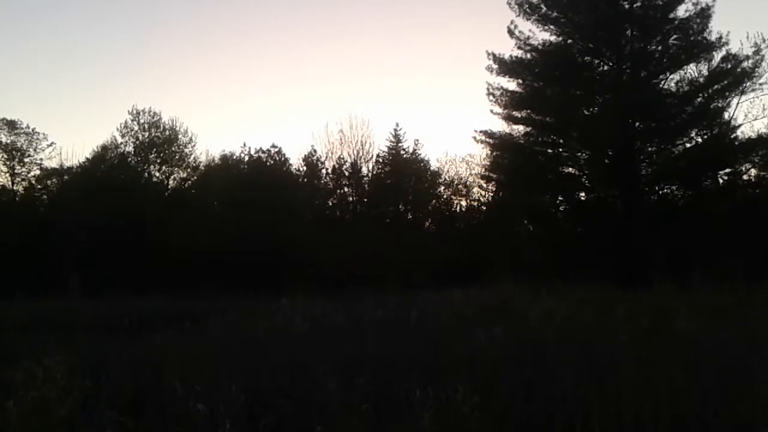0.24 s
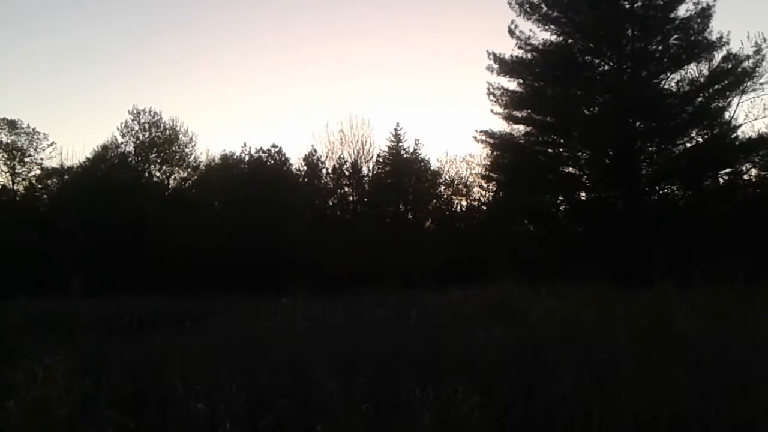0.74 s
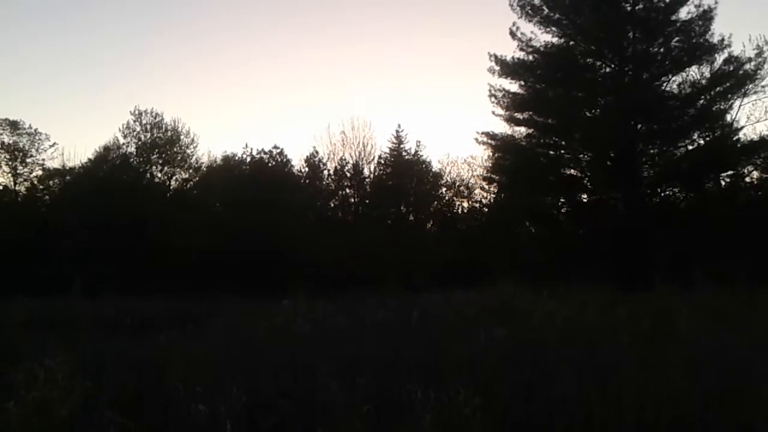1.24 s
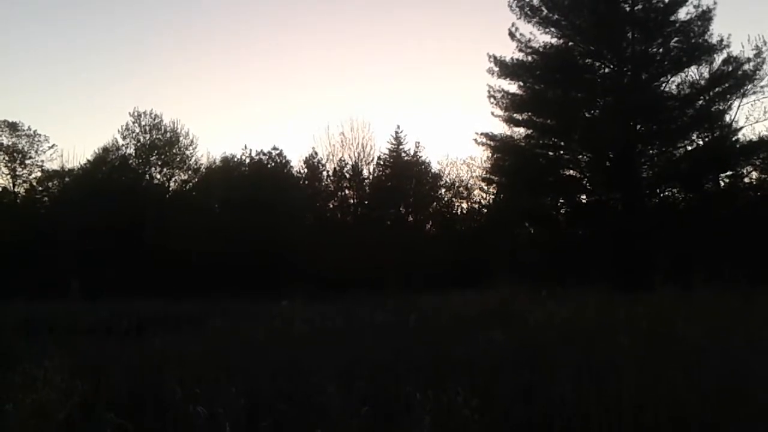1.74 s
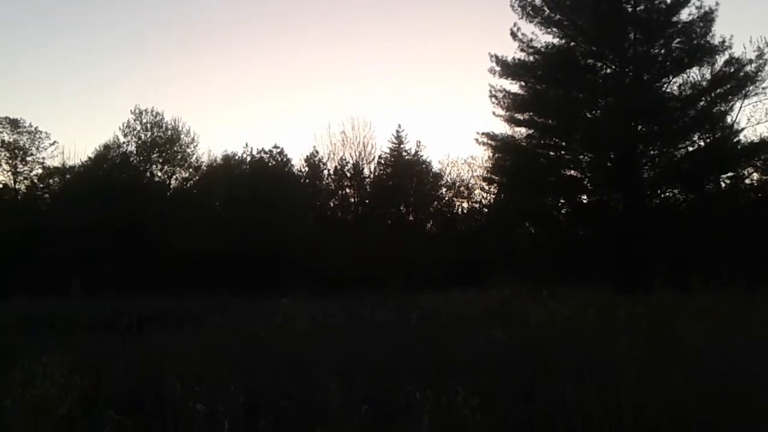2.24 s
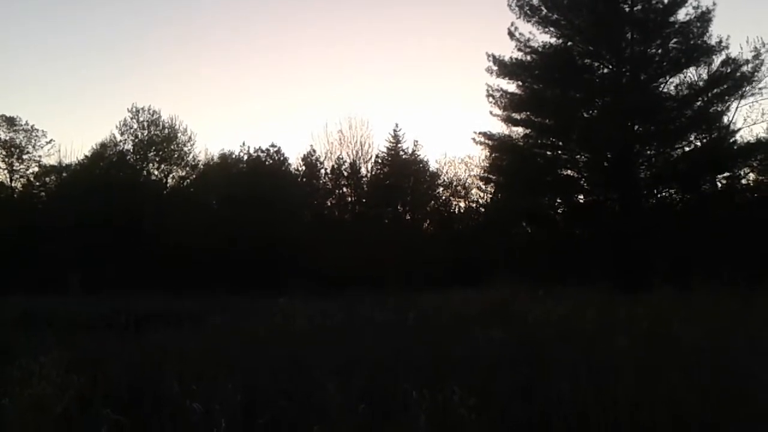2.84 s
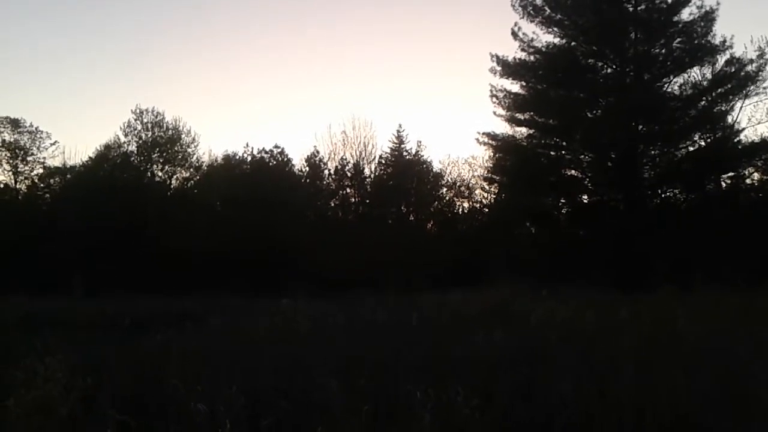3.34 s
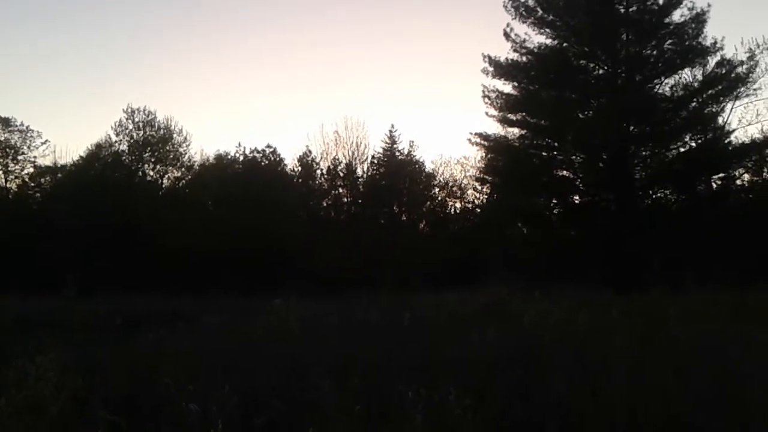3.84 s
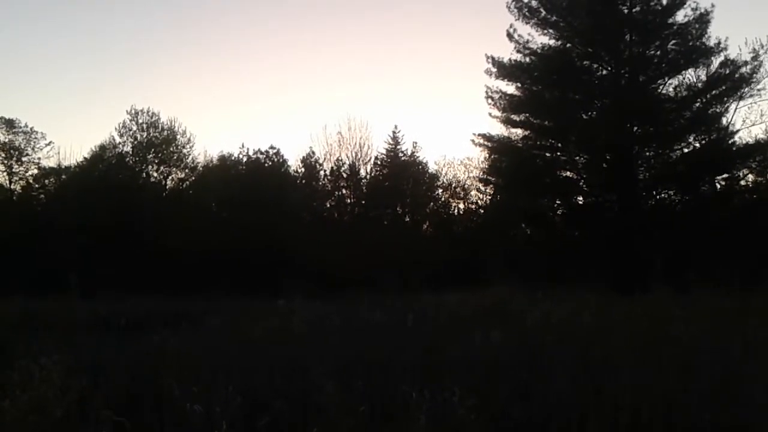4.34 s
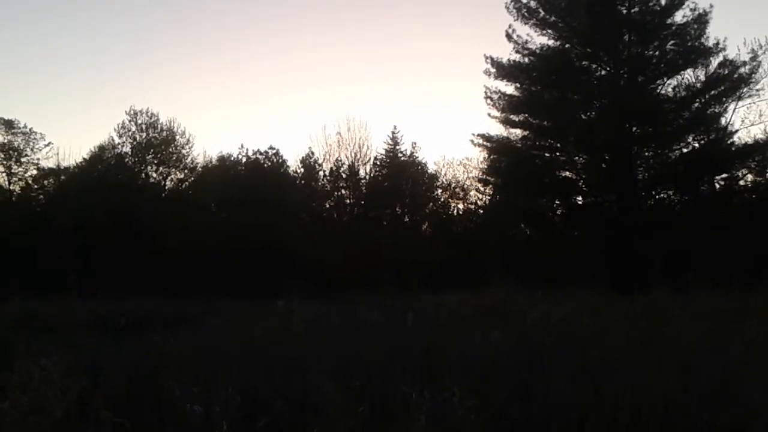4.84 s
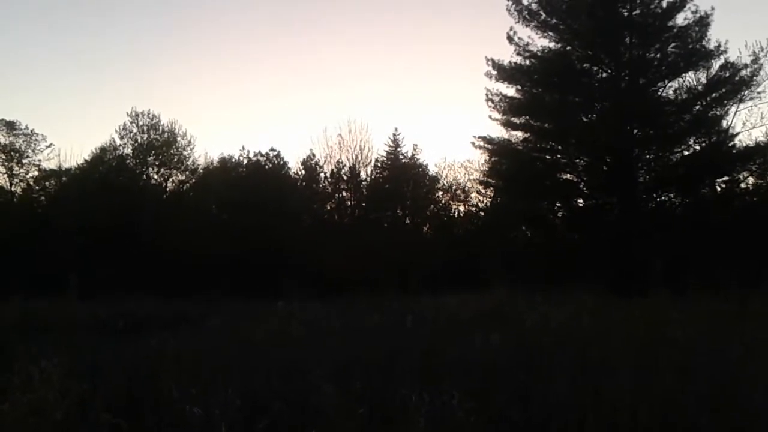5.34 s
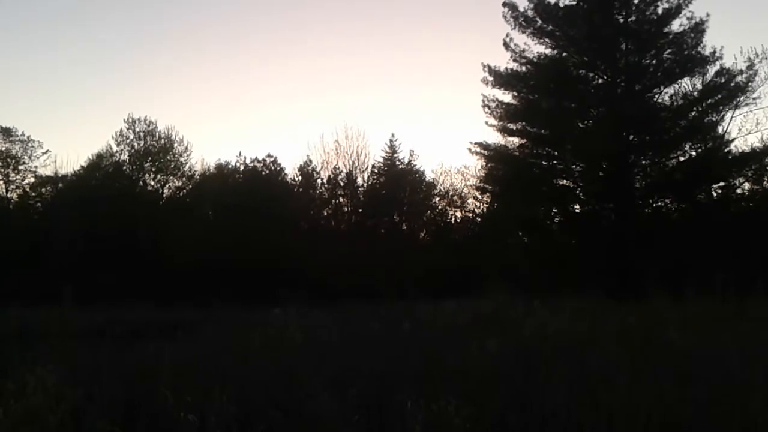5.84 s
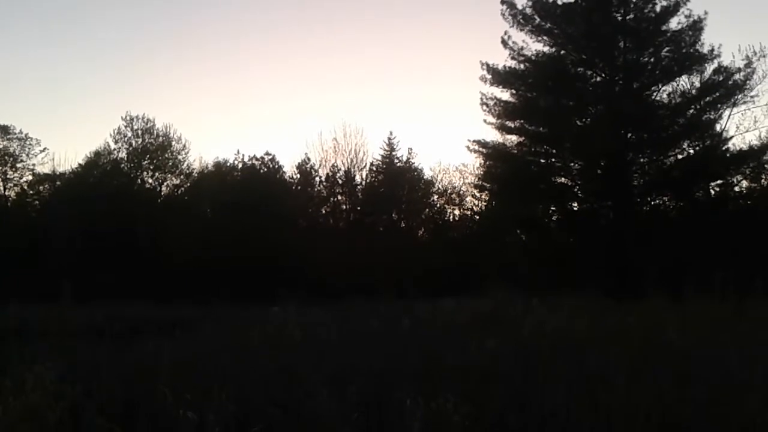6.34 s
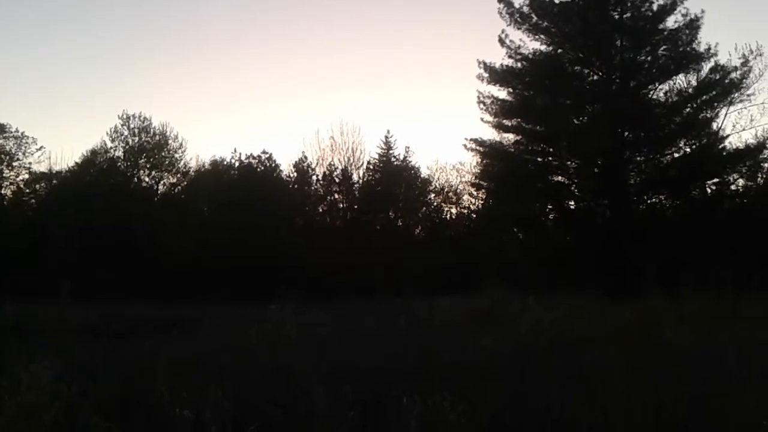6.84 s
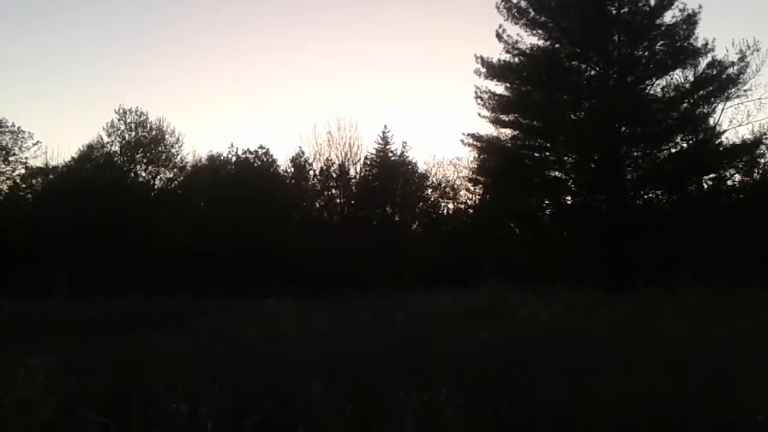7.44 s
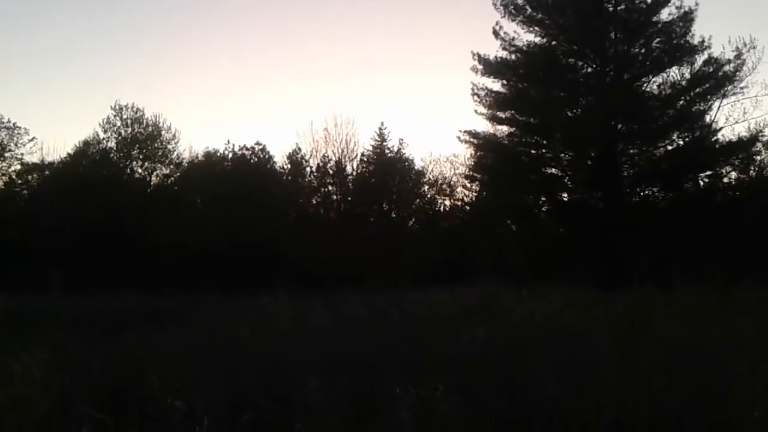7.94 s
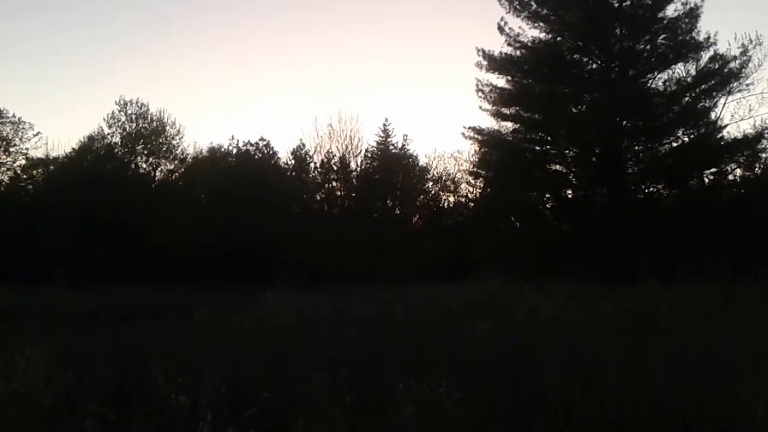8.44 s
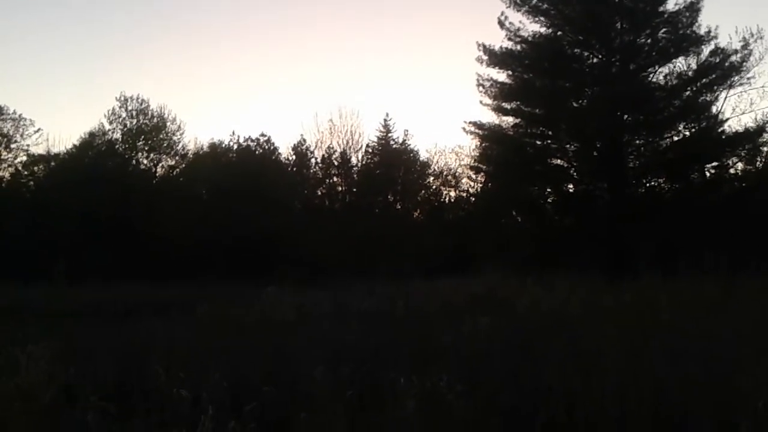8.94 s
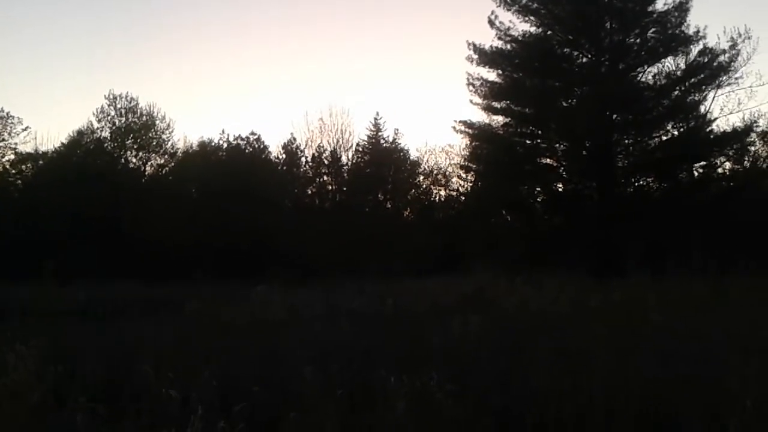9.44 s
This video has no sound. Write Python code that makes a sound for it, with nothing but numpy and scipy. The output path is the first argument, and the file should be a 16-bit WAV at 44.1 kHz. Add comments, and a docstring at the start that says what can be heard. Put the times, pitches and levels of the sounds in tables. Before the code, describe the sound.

Countless small frogs peep high and fast outdoors, tree frogs trill in overlapping bursts, sparse birds chirp and chip, faint distant traffic hum beneath.

```python
"""Small frogs whistle short rising peeps all over an open marsh at dusk: harmonic tones, the second strongest.
Tree frogs to the right call in slowing, overlapping trills of upward-scooping pulses. Birds whistle, chirp
and warble in gliding tones, and give chips of a falling tone with band noise. Distant traffic hum and
leafy hiss are shaped noise, with faint wandering tones; the tree line adds diffuse echoes to the calls."""
import sys
import numpy as np
from scipy import signal
from scipy.fft import rfft, irfft, next_fast_len
from scipy.io import wavfile
from scipy.ndimage import map_coordinates

SR = 44100
rng = np.random.default_rng(int(sys.argv[2]) if len(sys.argv) > 2 else 0)


def materialize(psi):
    """Save the field psi as 16-bit PCM at rate SR to the path in sys.argv[1].

    A 1-D psi becomes a single channel; in a 2-D psi each row is a channel.
    """
    bounded = np.clip(np.atleast_2d(psi).T, -1, 1)
    quanta = np.round(bounded * 32767).astype(np.int16)
    wavfile.write(sys.argv[1], SR, quanta)


N = 426888


def amp(db):
    """Amplitude ratio: 20 dB is a factor of ten."""
    return 10 ** (np.asarray(db) / 20)


def along(points, hz):
    """Interpolation of (frequency, value) points on a logarithmic frequency axis."""
    f, v = np.transpose(points)
    return np.interp(np.log(hz + 1), np.log(f + 1), v)


def filtered(x, response):
    """Linear filtering: the spectrum is multiplied by a response of frequency."""
    m = next_fast_len(N + SR // 4)
    hz = np.fft.rfftfreq(m, 1 / SR)
    return irfft(rfft(x, m) * response(hz), m)[..., :N]


def blank(spare_s=2):
    """Stereo silence with one second before the scene and room after it."""
    return np.zeros((2, N + spare_s * SR))


def add(track, s, sound, pan_db, lag_per_db):
    """Interaural cues: the farther microphone hears it softer and later (pan_db above 0 is left)."""
    for ear, side in enumerate((1, -1)):
        at = SR + round((s - side * pan_db * lag_per_db / 2) * SR)
        track[ear, at:at + len(sound)] += amp(side * pan_db / 2) * sound


def voice(hz, partials):
    """Harmonic synthesis: partials (multiple, dB) ride on one pitch curve from a chance phase."""
    phase = 2 * np.pi * (np.cumsum(hz) / SR + rng.random())
    return sum(amp(db) * np.sin(k * phase) for k, db in partials)


def flutters(t):
    """Two smooth random modulations, read at times t in steps of their random points."""
    return map_coordinates(rng.standard_normal((2, 16)), np.broadcast_arrays([[0], [1]], t))


def peep(length, hz, rise_hz, fade_db, third_db, fourth_db, bend=0.269):
    """Frequency-modulated harmonics: abrupt onset, flattening rise, unsteady throat, strong second harmonic."""
    t = np.arange(round(length * SR)) / SR
    u = t / length
    edges = np.clip(np.minimum(t / 0.008, (length - t) / 0.016), 0, 1)
    shape = edges * amp(fade_db * u)
    waver, upper = flutters(t * 60)
    partials = [(1, -31), (2, 5.5), (3, third_db + 2.35 * upper), (4, fourth_db - 6.4 * upper)]
    second_hz = hz + rise_hz * (u + bend * (u - u * u))
    return shape * amp(1.36 * waver) * voice(second_hz / 2, partials)


def peepers():
    """Level and arrival-time differences place each nearer frog on its own side."""
    # the nearer peeps: start_s, frog, level_db
    calls = [(-.01, "high", -35), (0.106, "thin", -31.5), (0.148, "reedy", -38.5), (0.257, "deep", -26.5),
             (0.269, "bright", -26), (0.434, "steady", -27), (0.65, "left", -38.5), (.712, "plain", -27.5),
             (0.796, "plain", -25.5), (.705, "high", -33.5), (0.883, "far", -36.5), (0.942, "short", -32.5),
             (1.116, "bright", -25), (1.239, "deep", -27.5), (1.244, "steady", -25.5), (1.334, "left", -39),
             (1.394, "high", -34.5), (1.401, "plain", -27.5), (1.524, "short", -32.5),
             (1.718, "shrill", -45), (1.809, "long", -35.5), (1.927, "plain", -35), (1.985, "left", -44),
             (1.989, "short", -34), (2.041, "high", -32.5), (2.065, "steady", -27), (2.226, "deep", -27.5),
             (2.357, "reedy", -37), (2.38, "plain", -27.5), (2.504, "bright", -25.5), (2.578, "plain", -31),
             (2.668, "short", -32), (2.702, "left", -41), (2.741, "high", -35), (2.901, "steady", -28),
             (2.993, "long", -31.5), (3.036, "deep", -26.5), (3.229, "shrill", -46),
             (3.256, "middle", -32.5), (3.314, "left", -43.5), (3.322, "short", -35), (3.433, "high", -33),
             (3.65, "bright", -25), (3.918, "deep", -26), (3.957, "middle", -32), (4.057, "left", -44.5),
             (4.097, "steady", -24.5), (4.259, "short", -33), (4.368, "short", -43.5), (4.392, "high", -33),
             (4.455, "bright", -26), (4.582, "bright", -32.5), (4.717, "deep", -25.5), (4.798, "left", -41),
             (4.901, "steady", -25.5), (5.026, "shrill", -51), (5.112, "high", -34), (5.182, "bright", -24),
             (5.329, "far", -36.5), (5.335, "thin", -38.5), (5.396, "plain", -36), (5.538, "deep", -27),
             (5.565, "short", -34), (5.718, "steady", -26), (5.802, "long", -39), (5.892, "left", -47),
             (6.06, "long", -42), (6.07, "far", -35.5), (6.082, "thin", -41), (6.11, "plain", -37),
             (6.202, "short", -33.5), (6.231, "high", -34), (6.288, "reedy", -33), (6.342, "middle", -36),
             (6.419, "bright", -27.5), (6.438, "reedy", -37), (6.492, "steady", -25), (6.613, "left", -45),
             (6.636, "shrill", -44.5), (6.721, "bright", -39.5), (6.749, "short", -30),
             (6.759, "deep", -28.5), (6.774, "thin", -34.5), (6.899, "shrill", -48), (6.976, "high", -33.5),
             (7.043, "long", -34), (7.191, "middle", -33), (7.324, "steady", -26), (7.398, "left", -47),
             (7.457, "reedy", -35), (7.484, "thin", -38), (7.492, "short", -33), (7.581, "reedy", -36.5),
             (7.616, "deep", -26.5), (7.649, "high", -34.5), (7.781, "short", -37), (7.911, "short", -31.5),
             (7.948, "bright", -26), (8.049, "middle", -36), (8.113, "left", -44), (8.177, "steady", -26.5),
             (8.256, "high", -35.5), (8.319, "reedy", -35), (8.454, "deep", -25.5), (8.543, "plain", -22.5),
             (8.557, "thin", -39.5), (8.699, "short", -32.5), (8.781, "left", -43), (8.853, "short", -31.5),
             (8.898, "high", -33), (8.971, "reedy", -31), (8.985, "steady", -26.5), (9.186, "bright", -27),
             (9.318, "far", -45.5), (9.355, "thin", -36), (9.482, "deep", -26), (9.56, "plain", -28),
             (9.656, "plain", -20)]
    # each frog's call and place: length_s, start_hz and rise_hz of the second harmonic, fade_db,
    # pan_db (left over right), third_db, fourth_db (the mean levels of those harmonics)
    frogs = {"deep": (.14, 2535, 210, -5, .7, -18, -29), "steady": (.124, 2720, 270, -3, -3, -30, -40),
             "high": (.1, 2925, 215, -2, -7.5, -30, -42), "bright": (.097, 2665, 200, -7, -3, -14, -20),
             "short": (.09, 2700, 185, -1, -6.5, -28, -34), "thin": (.072, 3050, 120, 2, .7, -24, -40),
             "left": (.078, 3080, 150, -2, 6, -25, -36), "reedy": (.1, 2545, 210, 0, -6, -12, -23),
             "middle": (.09, 2850, 200, -1, -5.5, -23, -35), "shrill": (.085, 2710, 170, 0, -4, -1, -16),
             "plain": (.092, 2680, 215, -3, -4.5, -22, -35), "far": (.14, 2600, 250, 2, -6, -22, -30),
             "long": (.17, 2690, 240, -4, -6, -14, -28)}
    track = blank()
    for s, frog, db in calls:
        length, hz, rise_hz, fade_db, pan_db, *overtones = frogs[frog]
        call = peep(length, hz, rise_hz, fade_db, *overtones)
        add(track, s, amp(db) * call, pan_db, lag_per_db=4e-5)
    return track[:, SR:SR + N]


def far_peepers(count=370):
    """A chorus as superposed independent calls, spread evenly with chance offsets; high voices are fainter."""
    track = blank()
    for k, (when, pitch, far, side, bright) in enumerate(rng.random((count, 5))):
        length = .07 + .06 * side
        hz = 2540 + 480 * pitch ** 1.3
        third_db = -30 + 20 * bright
        fourth_db = -33 + 12 * bright - 12 * pitch
        call = peep(length, hz, 300 - 120 * pitch, 1, third_db, fourth_db)
        start = (k + 8 * when - 8) / count * N / SR
        level = amp(-37.5 - 15 * far - 8 * pitch ** 2)
        add(track, start, level * call, -9 * side + 2.5, lag_per_db=9e-5)
    return track[:, SR:SR + N]


def trill(track, first, last, pulses, lead, hz, db, low_db, pan_db=-5.5):
    """Pulse train of scoop, slow climb and steep hook; the first few are weak and flat while the sac fills."""
    # overtones of the rasp: harmonic, level_db
    rasp_partials = [(4, -35), (5, -27), (6, -38), (7, -26)]
    u = np.linspace(0, 1, round(pulses))
    v = np.linspace(0, 1, round(.038 * SR))  # through one 38 ms pulse
    stop = np.clip((1 - v) / 0.19, 0, 1)
    glide = .86 + .21 * v - .12 * np.exp(-v / .15) + .2 * v ** 6
    times = first + (last - first) * u - lead * (1 - (2 * u - 1) ** 2)  # the gaps widen
    for k, s in enumerate(times):
        size, tune = rng.standard_normal(2)
        shake, flutter = flutters(14 * v)
        empty = np.exp(-k / 2.1)  # share of the sac still to fill
        sweep = hz * (1 - 0.06 * np.exp(-k / 3) + 0.008 * tune + 0.01 * shake) * glide
        high = np.sin(np.pi * v ** 1.9) ** 1.7 * amp(1.2 * flutter) * voice(sweep, [(2, 1.5)])
        crest = np.sin(np.pi * v ** 1.09) ** 8.9
        rasp = crest * np.tanh(flutter) * voice(sweep, rasp_partials)
        upper = amp(db - 18 * empty + 1.1 * size) * (high + rasp)
        add(track, s - .008, upper, pan_db, lag_per_db=4.2e-5)
        low = v ** 2.3 * stop * amp(2 * shake) * voice(sweep, [(1, 1.5)])
        low *= amp(db + low_db - 9 * empty + 1.4 * size)
        # the fundamental bends round the microphone body: little shading
        add(track, s - .008, low, -1, lag_per_db=1.6e-4)


def tree_frogs():
    """Superposition of overlapping trills, each a single pulse train."""
    # trills: first_pulse_s, last_pulse_s, pulses, lead_s (of the middle pulse on half time),
    # pitch_hz (nominal fundamental), level_db, fundamental_db (relative to the level)
    trills = [(-0.575, 0.12, 13.0, .012, 957, -23, -20.5), (0.286, 1.029, 14.0, .011, 992, -20, -11),
              (0.585, 1.657, 17.0, 0.0087, 923.4, -22.5, -8),
              (1.834, 2.753, 14.0, 0.011, 955.5, -25.5, -9.5), (2.021, 2.928, 15.0, .012, 936.5, -27, -8.5),
              (3.433, 4.371, 18.0, 0.026, 991, -19, -13.5), (3.634, 5.163, 26.0, 0.02, 962, -20, -13.5),
              (4.701, 5.85, 20.0, 0.019, 979, -25.5, -16), (5.973, 6.731, 12.0, 0.011, 964, -23.5, -11.5),
              (6.143, 7.012, 16.0, 0.014, 996.3, -22, -7.5), (7.377, 8.04, 13.0, 0.0075, 958, -21.5, -16.5),
              (7.607, 8.815, 19.0, 0.014, 934.4, -21, -8), (8.101, 9.008, 14.0, 0.013, 890.4, -26, -10.5)]
    track = blank(3)
    for row in trills:
        trill(track, *row)
    return track[:, SR:SR + N]


def bird_whistles():
    """Gliding tones with a weak octave; a high power of time holds the pitch before it drops."""
    # sliding whistles: start_s, length_s, start_hz, end_hz, level_db
    slides = [(2.04, .17, 3620, 3400, -52), (9.151, 0.11, 3150, 3540, -49)]
    # notes that hold and then drop: start_s, length_s, start_hz, end_hz, level_db
    hooks = [(0.0, .045, 7350, 5900, -50), (.475, .06, 6700, 5500, -52), (.682, .045, 6900, 5900, -49),
             (1.106, .04, 6550, 5400, -46), (1.635, .048, 7000, 3700, -37), (2.2, .045, 6700, 5100, -52),
             (2.485, .045, 6900, 5500, -56), (3.075, .055, 6950, 5700, -54), (3.375, .03, 6900, 5700, -55),
             (3.53, .055, 7000, 6600, -55), (3.94, .05, 6950, 5600, -52)]
    track = blank()
    for rows, power in ((slides, 1), (hooks, 3)):
        for s, length, start_hz, end_hz, db in rows:
            u = np.linspace(0, 1, round(length * SR))
            hz = start_hz + (end_hz - start_hz) * u ** power
            note = np.sin(np.pi * u) ** 0.4 * voice(hz, [(1, 0), (2, -24)])
            add(track, s, amp(db) * note, -2, lag_per_db=1e-5)
    return track[:, SR:SR + N]


def bird_chirps():
    """Frequency sweeps of a pure tone that shoot up and tip back down."""
    # chirps: start_s, start_hz, level_db
    chirps = [(.05, 3800, -37), (.128, 3900, -39), (.208, 3800, -44), (.31, 3750, -48), (.41, 3650, -46),
              (.48, 3500, -46), (.556, 3400, -39), (.652, 3400, -37), (.765, 3350, -39), (.872, 3400, -45)]
    rise_hz, length_s, rising_share = 1050, .038, .66
    track = blank()
    u = np.linspace(0, 1, round(length_s * SR))
    arch = np.interp(u, [0, rising_share, 1], [0, 1, .35])
    for s, hz, db in chirps:
        chirp = np.sin(np.pi * u) * voice(hz + rise_hz * arch, [(1, 0)])
        add(track, s, amp(db) * chirp, -2, lag_per_db=1e-5)
    return track[:, SR:SR + N]


def far_warble(count=90):
    """Rising tone strokes of a far bird, sinking in register over the first second."""
    track = blank()
    u = np.linspace(0, 1, round(.018 * SR))
    for when, pitch in rng.random((count, 2)):
        hz = 4200 - 400 * when + 600 * (pitch - .5) + 450 * u
        stroke = np.sin(np.pi * u) * voice(hz, [(1, 0)])
        add(track, when, amp(-51 - 3 * when) * stroke, -2, lag_per_db=1e-5)
    return track[:, SR:SR + N]


def bird_chips():
    """Band-limited noise bursts around a fast falling tone; the higher band peaks later."""
    # harsh chips of another bird: time_s, level_db
    chips = [(2.641, -30), (3.3983, -34), (4.467, -28.5), (5.592, -30), (6.803, -28), (7.3923, -29.5),
             (8.1767, -27), (9.248, -26.5)]
    track = blank()
    t = np.arange(round(.07 * SR)) / SR
    for s, db in chips:
        chip = amp(-7) * np.sin(np.pi * np.clip(t / .022, 0, 1)) * voice(4450 - 4e4 * t, [(1, 0)])
        for lo_hz, hi_hz, peak_s, part_db in ((3300, 4300, .005, 0), (4300, 5900, .009, -11)):
            band = signal.butter(3, [lo_hz, hi_hz], "band", fs=SR, output="sos")
            noise = signal.sosfilt(band, rng.standard_normal(len(t)))
            burst = (t / peak_s) * np.exp(1 - t / peak_s)
            chip = chip + amp(part_db) * noise * burst
        add(track, s - .008, amp(db) * chip, -2, lag_per_db=1e-5)
    return track[:, SR:SR + N]


def rush(spectrum, db):
    """Partial coherence: steady stereo noise, alike on both sides in the bass."""
    # left-right likeness of the background: frequency_hz, correlation
    likeness = [(60, 1), (250, 0.79), (600, 0.52), (1500, 0.01)]

    def mid_side(hz):
        turn = np.arccos(np.clip(along(likeness, hz), 0, 1)) / 2
        return amp(along(spectrum, hz)) * [np.cos(turn), np.sin(turn)]

    mid, side = filtered(rng.standard_normal((2, N)), mid_side)
    pair = np.array([mid + side, mid - side])
    return amp(db) * pair / pair.std()


def traffic():
    """Low-frequency shaped noise: the hum of distant traffic."""
    # spectrum of the hum: frequency_hz, relative density_db (per Hz)
    hum = [(15, -57), (25, -35), (54, 1), (120, 4), (258, -12.5), (360, -10), (800, -12.5), (1040, -29.5),
           (1760, -120)]
    return rush(hum, db=-49.0)


def leaves():
    """Broadband shaped noise: leaves and hiss."""
    # spectrum of the air: frequency_hz, relative density_db (per Hz)
    air = [(500, -14), (1000, -11), (1400, -14), (2500, -16), (3550, -24), (4300, -18), (7000, -23),
           (9000, -28), (14500, -28.5)]
    return rush(air, db=-54.0)


def drone():
    """Slow frequency modulation: thin tones whose pitch wanders by a few hertz."""
    # faint tones in the hum: mean pitch_hz, level_db
    tones = [(367, -69), (580, -70), (678, -66)]
    steps = np.broadcast_arrays([[0], [1], [2]], np.linspace(0, 60, N))
    wander = map_coordinates(rng.standard_normal((len(tones), 64)), steps)
    return sum(voice(hz + 3 * w, [(1, db)]) for (hz, db), w in zip(tones, wander))


def tree_line(x, t60, db, size=8192):
    """Diffuse scattering from reeds and trees, different on each side and changing as the air moves."""
    t = np.arange(SR // 2) / SR
    source = np.pad(x, ((0, 0), (size, 2 * size)))
    wet = blank()
    window = signal.get_window("hann", 2 * size)  # overlapping pieces, each with its own echo tail
    for at in range(0, N + size, size):
        tail = rng.standard_normal((2, len(t))) * amp(-60 * t / t60) * np.clip(t / 0.0054, 0, 1)
        piece = source[:, at:at + 2 * size] * window
        echo = signal.fftconvolve(piece, tail / np.linalg.norm(tail[0]), axes=1)
        wet[:, at:at + echo.shape[1]] += echo
    scatter = lambda hz: 1 / (1 + (550 / (hz + 1)) ** 2)  # thin stems scatter little bass
    return x + amp(db) * filtered(wet[:, size:size + N], scatter)


def body_shade(left):
    """Acoustic shadow: the microphone body shades the left side from high calls."""
    # shading: frequency_hz, gain_db
    shade = [(3300, 0.5), (4200, -4.5), (7000, -32.5)]
    return filtered(left, lambda hz: amp(along(shade, hz)))


def scene():
    """Superposition: calls with their echoes, over the steady background."""
    near_birds = bird_whistles() + bird_chirps() + bird_chips()
    calls = tree_line(peepers() + near_birds, t60=0.23, db=-7)
    calls += tree_line(far_peepers() + far_warble(), t60=.35, db=-.5)
    calls += tree_line(tree_frogs(), t60=1.1, db=-9)
    calls[0] = body_shade(calls[0])
    return calls + traffic() + leaves() + drone()


def record(dry):
    """Band limiting: the microphone loses the deepest bass; nothing is kept above the top frequency."""
    top_hz = 14550
    return filtered(dry, lambda hz: (hz < top_hz) / (1 + (42 / (hz + 1)) ** 4))


dry = scene()
out = record(dry)
materialize(out)
```